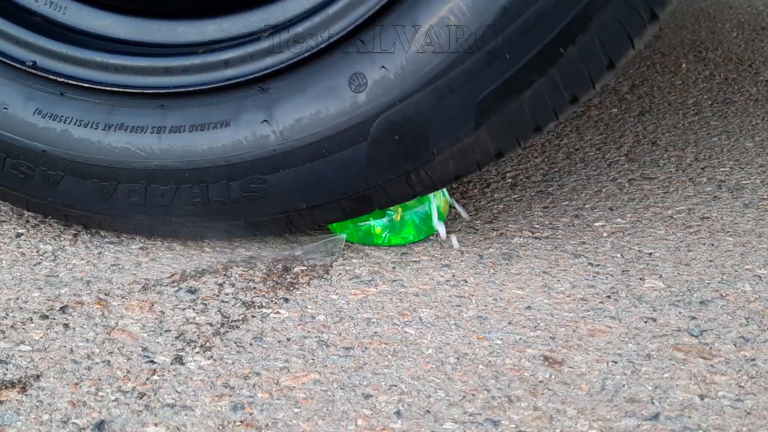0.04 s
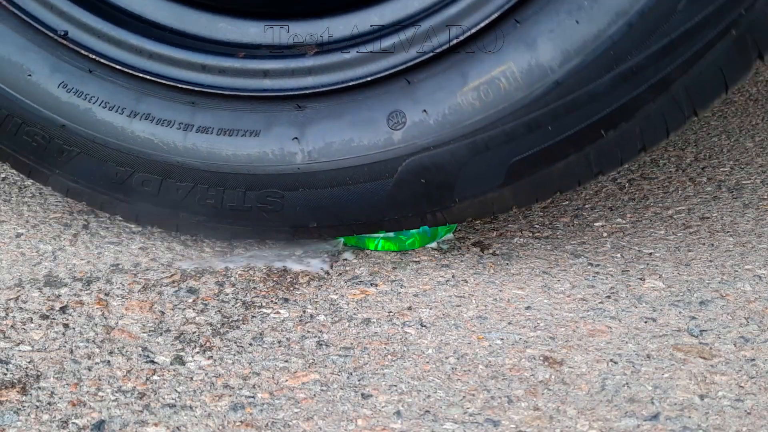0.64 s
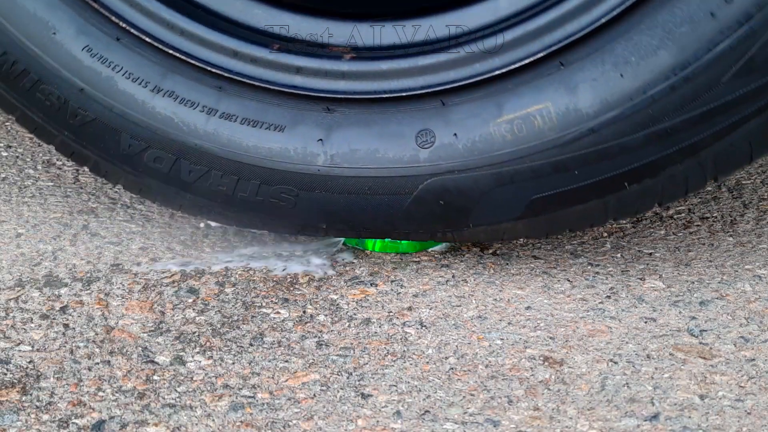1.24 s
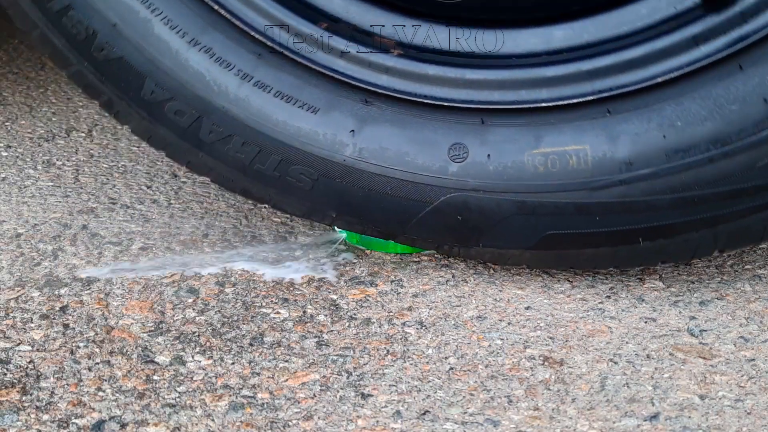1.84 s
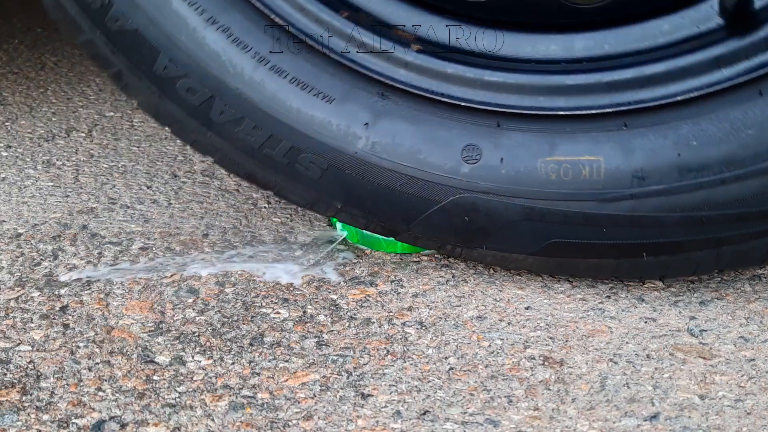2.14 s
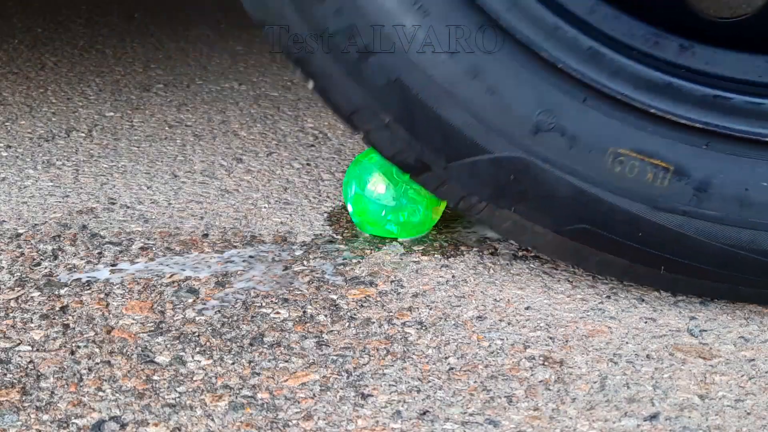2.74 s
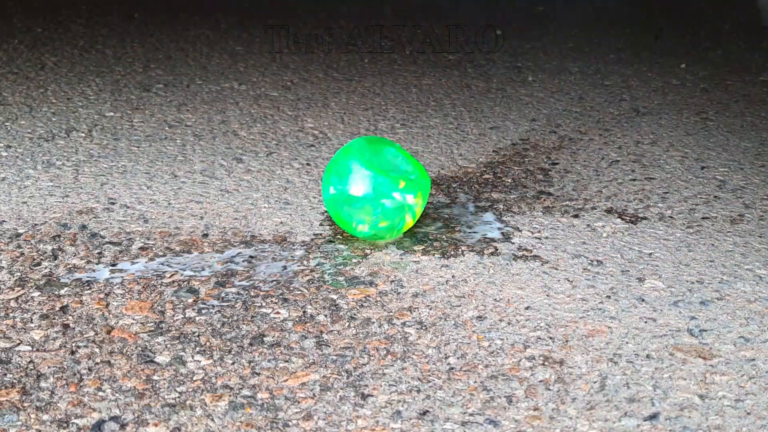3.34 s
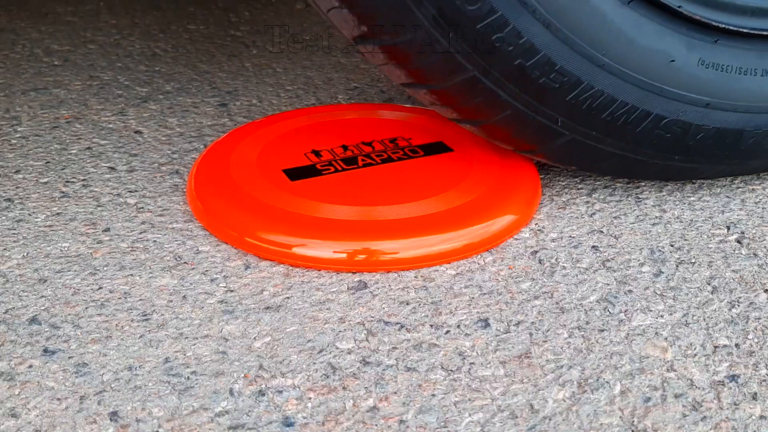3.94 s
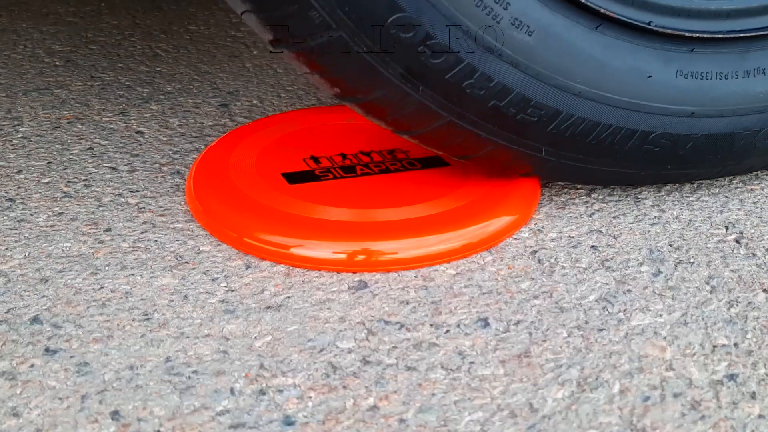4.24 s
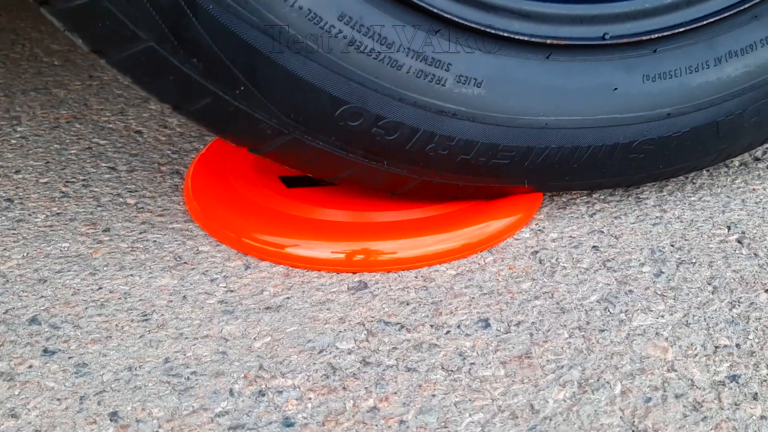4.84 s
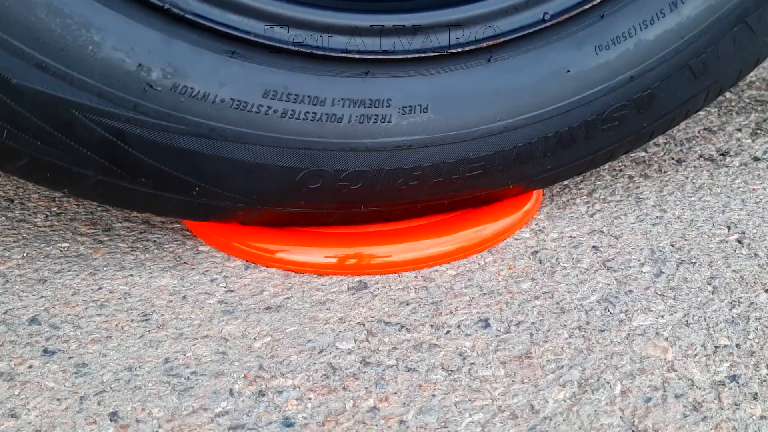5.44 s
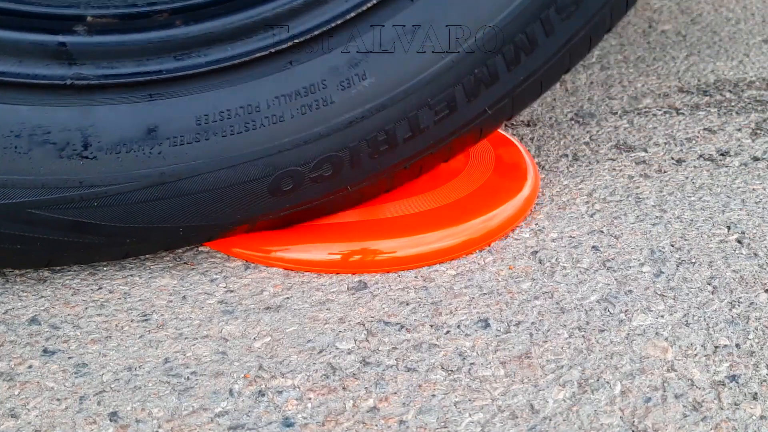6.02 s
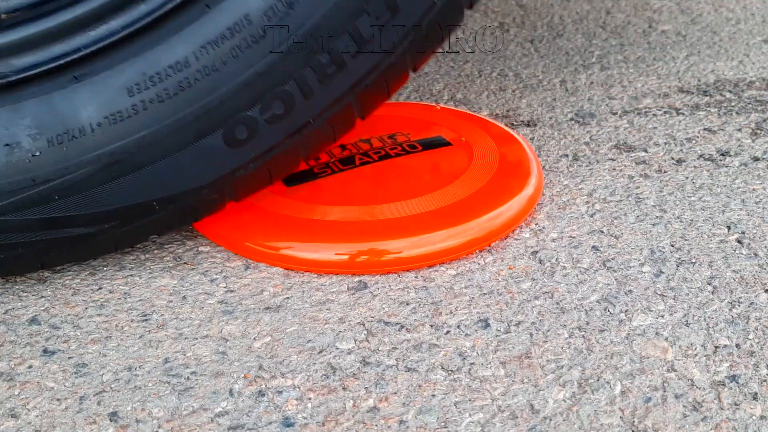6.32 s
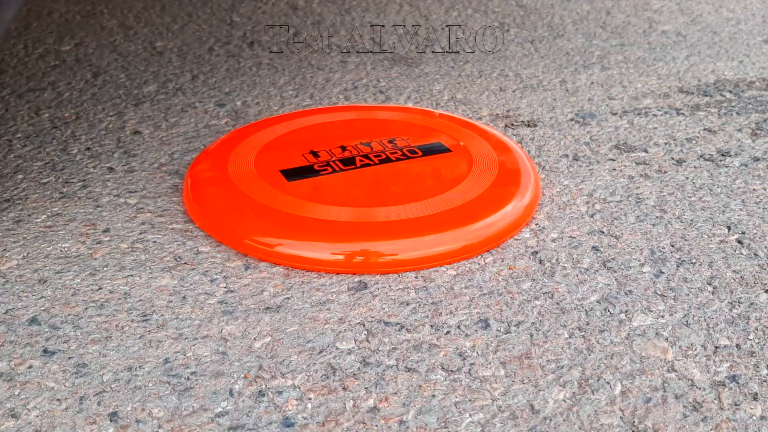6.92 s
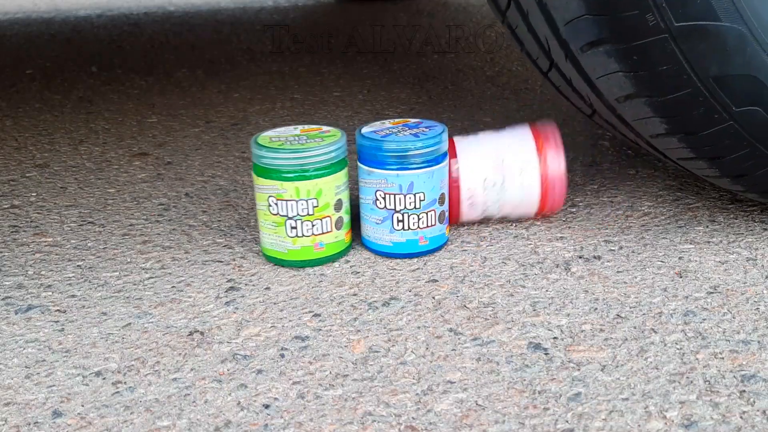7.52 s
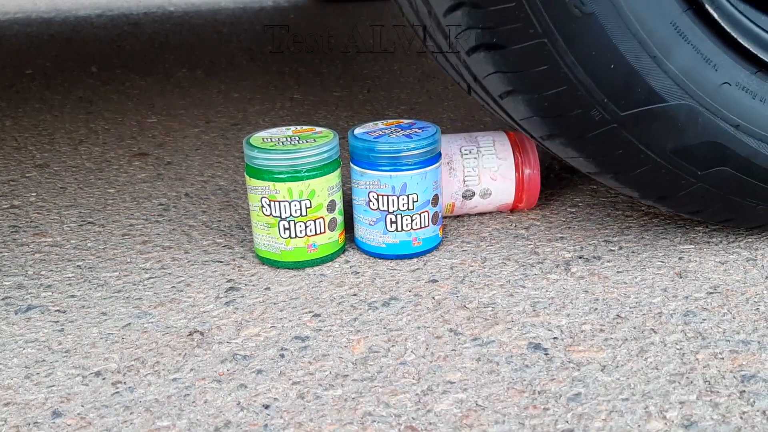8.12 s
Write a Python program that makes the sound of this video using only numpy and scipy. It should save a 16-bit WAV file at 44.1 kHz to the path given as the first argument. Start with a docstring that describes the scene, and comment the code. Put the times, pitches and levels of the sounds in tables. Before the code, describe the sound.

A car creeps over concrete outdoors, its engine whirring thinly. A liquid-filled ball under the tyre gives a brief high whistle, sprays with a spattering hiss, gurgles and pops back into shape. Next a plastic disc clicks, cracks sharply and creaks under the tread. Finally a jar tips against two others with a few quick knocks. The microphone is low and close beside the tyre, with little bass.

```python
"""Car crushing a ball, a disc and jars

A car creeps over concrete, heard from a phone low beside the front tyre. A liquid-filled ball
splits, whistles, sprays and pops back into shape; a plastic disc buckles, creaks and cracks; a jar
is tipped against two others. The engine whirrs through the gap under the car, the tread hums on wet
grit and the blows echo off the floor pan. The phone cuts the bass and clips at full scale."""
import sys
import numpy as np
from scipy import signal
from scipy.fft import rfft, irfft
from scipy.io import wavfile
from scipy.ndimage import uniform_filter1d, map_coordinates

SR = 44100
rng = np.random.default_rng(int(sys.argv[2]) if len(sys.argv) > 2 else 0)


def bounce(signal):
    """Save signal as a 16-bit WAV file at the path given by the first command-line argument."""
    frames = np.transpose(np.atleast_2d(signal))
    limited = np.clip(frames, -1, 1)
    pcm = np.round(limited * 32767).astype(np.int16)
    wavfile.write(sys.argv[1], SR, pcm)


N = 360297
TIME_S = np.arange(N) / SR
SHORT_SAMPLES = 8192
DISC_START_S, JARS_START_S, END_S = 3.45, 7.028, N / SR

# liquid flow from the ball (time [s], level [dB])
FLOW = [(0.15, -32.5), (0.38, -31.5), (0.61, -28), (0.85, -26), (1.36, -31.5), (1.61, -29.5), (2.33, -41),
        (2.56, -45.5)]
# spectra of jet, droplets and gurgle (frequency [Hz], level [dB])
JET_SPECTRUM = [(4000, -12), (6500, -16), (8500, -4), (10000, 2), (11700, 5.5), (12800, 0), (14500, 4),
                (16000, 0.5)]
SPLASH_SPECTRUM = [(600, -71), (1100, -17), (2000, -5.5), (2700, -6), (3400, -0.5), (4700, 3), (6000, 0),
                   (7500, -1.5), (10000, -10.5)]
GURGLE_SPECTRUM = [(350, -68), (800, -13.5), (1300, 9.5), (2000, 10), (2700, 6), (4000, -14.5)]
# droplet flurries (time [s], level [dB], rise [s], fall [s], lower ring [Hz], upper ring [Hz])
SURGES = [(0.5, -31.5, 0.191, 0.19, 4510, 6730), (1.06, -24.5, 0.18, 0.16, 3765, 5490),
          (1.25, -28.5, 0.19, 0.28, 4620, 5300), (1.79, -25.5, 0.35, 0.22, 3376, 7500)]
# sputtering at the split (time [s], level [dB], rise [s], fall [s])
GURGLES = [(1.06, -35, 0.08, 0.15), (2.35, -35.5, 0.12, 0.32)]
# puffs of distortion at the whistle's peaks (time [s], level [dB])
OVERLOAD_PUFFS = [(0.04, -41.5), (0.086, -45)]
# air re-entering the ball (time [s], hollow tone [dB], hiss [dB], rise [s], fall [s])
GULPS = [(2.34, -32, -59, 0.11, 0.38), (2.72, -27, -23.5, 0.125, 0.028), (2.768, -27, -33, 0.036, 0.049)]
# ball skin unfolding (time [s], level [dB], pitch [Hz], relative crinkle [dB], t60 [s])
BALL_POPS = [(2.705, -14, 3100, -1, 0.0094), (2.712, -10, 3330, 5, 0.0093), (2.717, -18, 3500, -19, 0.011),
             (2.724, -16.5, 1710, 7, 0.019), (2.727, -13.5, 6470, 10, 0.018), (2.7478, 2, 3680, -14, 0.015),
             (2.771, -30, 3020, 2, 0.012), (2.870, -33, 2110, -2, 0.029), (2.96, -16.5, 4000, -11, 0.0052)]

# disc cracks and knocks, including quick slap echoes of the crack just before (time [s], level [dB],
# top mode [dB], thud [dB], rim [dB], snap [dB], dish pitch [Hz], rim pitch [Hz]);
# top mode to snap are relative gains
DISC_KNOCKS = [(3.992, -23.5, -10, -20, -11, -35, 1610, 4570), (4.027, -15.5, 3, -17, -13, -34, 1577, 4000),
               (4.04, -28, 1, -8.5, -4, -19, 1520, 3660), (4.9634, -10, -1, -11, -5.5, -4, 1614, 4750),
               (4.992, -7, -6.5, -8, -12.5, -11, 1445, 3270), (6.05, -26.5, 0, -7, 6, 3.5, 1490, 4090),
               (6.104, -8.5, -1, -22, -4.5, -17.5, 1572, 3750),
               (6.162, -20, -11, -28, -15, -22, 1505, 3250),
               (6.228, -10.5, -11, -29, -0.5, -18.5, 1642, 3350), (6.333, -41, -8, -2, 2, -15, 1630, 3650),
               (6.366, -17.5, -5, -15.5, -11, -15.5, 1580, 3700),
               (6.383, -27.5, -9, -14, -2, -22, 1560, 3460), (6.41, -11, 2, -9.5, -2.5, -23.5, 1570, 3360),
               (6.425, -18, -4, -14, -14, -20, 1600, 3530), (6.44, -26, -6, -10, -9, -25, 1570, 4370)]
# short disc ticks, including quick slap echoes (time [s], level [dB], relative rim level [dB])
DISC_TICKS = [(4.096, -31.5, -8), (4.42, -26, -18), (4.702, -25, -10.5), (4.7748, -31.5, -2.5),
              (4.858, -23.5, 0.5), (4.907, -25, -9), (4.92, -27, -9), (4.974, -22, -5), (4.981, -26, -1),
              (5.039, -39, 2), (5.635, -20, -10.5), (5.682, -24.5, -10), (5.761, -25.5, 4),
              (5.875, -41, -10)]
# whole-disc modes (frequency [Hz], level [dB], t60 [s])
THUD_MODES = [(756, -15, 0.018), (879, 3, 0.021), (1140, -2, 0.044)]
# dish and rim modes (pitch ratio, level [dB], t60 [s])
DISH_MODES = [(0.88, -9.5, 0.013), (1, -0.5, 0.015), (1.1, -8.5, 0.011), (1.39, 6, 0.0067)]
RIM_MODES = [(0.85, 0.5, 0.0094), (1, 6, 0.013), (1.13, -1, 0.011), (1.38, -14, 0.013)]
# disc snap and ball crinkle (frequency [Hz], level [dB])
SNAP_SPECTRUM = [(2500, -20), (5000, -11.5), (7500, -1.5), (10500, -2.5), (13000, -5), (16000, -1)]

# jars struck and scraped (time [s], level [dB], rise [s], t60 [s], relative grit [dB])
JAR_KNOCKS = [(7.274, -38.5, 0.0013, 0.043, 1.5), (7.441, -18, 0.004, 0.033, -5),
              (7.448, -13, 0.00055, 0.053, -4.5), (7.462, -19, 0.0016, 0.036, -23),
              (7.527, -34, 0.002, 0.067, -3), (7.5438, -29.5, 0.0003, 0.05, -1),
              (7.5918, -18, 0.00015, 0.016, -8), (7.622, -28, 0.004, 0.041, -12),
              (7.633, -30, 0.0017, 0.12, -2.5)]
# modes of a full jar (frequency [Hz], width [Hz], level [dB])
JAR_MODES = [(354, 160, -15), (595, 106, -10), (920, 260, -5.5), (1210, 140, -0.5), (1484, 96, 4.5),
             (2000, 146, 2.5), (2330, 160, 1.5), (2920, 370, -1.5), (3900, 710, -9.5), (5670, 780, -10.5)]
# grit on concrete (frequency [Hz], level [dB])
GRIT_SPECTRUM = [(2000, -25), (4500, -4), (8000, 1), (12000, 0), (16000, -1)]
# wet grit under the tread (time [s], level [dB], rise [s], fall [s])
GRIT_PATCHES = [(2.95, -46, 0.18, 0.32), (3.31, -43, 0.088, 0.15), (4.11, -43.5, 0.042, 0.09),
                (4.85, -50.5, 0.57, 0.15), (6.35, -45.5, 0.08, 0.11)]

# engine whirr beside each object, and engine hiss (frequency [Hz], level [dB])
WHIRR_AT_BALL = [(120, -85), (200, -61.5), (683, -20.5), (791, -14.5), (1230, -3.5), (1350, -7), (1530, 1),
                 (1650, -3.5), (2090, 0.5), (2420, -3), (4270, -0.5), (4860, -5.5), (7140, -15),
                 (11700, -11.5), (16000, -14)]
WHIRR_AT_DISC = [(120, -85), (200, -51.5), (558, -32), (847, -19.5), (1110, -16), (1170, -13.5),
                 (1340, -11.5), (1510, -9.5), (1680, -8), (2010, -6.5), (3330, -12.5), (4480, -10),
                 (5050, -12.5), (7000, -23.5), (9100, -62), (15400, -120)]
WHIRR_AT_JARS = [(120, -89), (200, -32), (440, -29.5), (511, -31), (698, -27), (752, -13), (859, -11.5),
                 (1120, -5.5), (1510, -4), (2070, -0.5), (3180, -7), (4100, -4), (7000, -15), (9100, -45),
                 (15400, -120)]
ENGINE_HISS = [(4500, -31), (6300, -6.5), (8000, -6.5), (10000, -11), (12000, -5), (15500, -13)]
# engine beside the disc: fades, ducks after the loud crack, partly recovers (time [s], level [dB])
ENGINE_LEVEL_AT_DISC = [(3.6, -36), (4.35, -44), (4.9, -44), (5.13, -51.5), (5.6, -48), (6.1, -47.5),
                        (7.0, -45.5)]
# resonances between car and ground (frequency [Hz], width [Hz], boost [dB])
GAP_RESONANCES = [(1543, 117, 8.5), (2030, 290, 4), (2960, 570, 1.5), (4350, 600, 1)]
# hollow between wheel and ground (time [s], frequency [Hz], level [dB])
WHEEL_NOTE = [(0, 1120, -57), (0.8, 1080, -55), (2.3, 1200, -54.5), (3.0, 1400, -51.5), (3.4, 1350, -52),
              (3.8, 1550, -45.5), (4.3, 1230, -59), (4.9, 1130, -64)]
# tread groove resonances (frequency [Hz], width [Hz], level [dB])
GROOVE_MODES = [(2107, 390, -0.3), (4255, 950, -1)]
# tread meeting the disc, then bearing down (time [s], level [dB], rise [s], fall [s])
TREAD_SWELLS = [(3.55, -39, 0.2, 1.27), (4.92, -47, 0.42, 0.1)]


def spray(jet_db=4, fresh_lift_db=8, jet_end_s=2.66, splash_end_s=2.18, wedge_hz=4650):
    """A thin jet hisses from the split; droplets hit the concrete and ring the wedge under the tread."""
    flow = undb(curve(FLOW))
    nozzle = noise_band(11600 + 150 * walk(4), 900, likeness=0)
    jet = reflections(unit(colour(noise(), JET_SPECTRUM)) + undb(-9.5) * nozzle, 0.23)
    jet *= flow * undb(jet_db + fresh_lift_db * freshness() + 0.23 * walk(40)) * pan(1)
    patter = droplets(spread_db=1)
    wedge = noise_band(wedge_hz * (1 + 0.03 * walk(12)), 960, likeness=0) * undb(-9.5 + 2 * walk(25))
    splash = reflections(patter + wedge, 0.61) * flow
    return jet * gate(0, jet_end_s) + splash * gate(0, splash_end_s, fade_s=0.21)


def droplets(spread_db):
    """Fine drops of uneven size patter on concrete; rms 1."""
    return unit(colour(noise() * undb(spread_db * rng.exponential(size=(2, N))), SPLASH_SPECTRUM))


def surges():
    """Heavier flurries of droplets, each ringing two resonances of the wedge."""
    patter = droplets(spread_db=1.8)
    waver = 1 + 0.025 * walk(12)
    out = 0
    for s, db, rise_s, fall_s, lower_hz, upper_hz in SURGES:
        lower = undb(-2.5) * noise_band(lower_hz * waver, 500, likeness=0)
        upper = undb(-3) * noise_band(upper_hz * waver, 930, likeness=0)
        out += undb(db) * swell(s, rise_s, fall_s) * unit(patter + lower + upper)
    rms = np.sqrt(np.mean(out ** 2))
    return rms * reflections(out, 0.58, count=4)


def gurgle():
    """Air and liquid sputter through the split together, lower than the jet."""
    return unit(colour(noise(0.12), GURGLE_SPECTRUM)) * swells(GURGLES) * undb(2 * walk(130))


def whistle(level_db=-21.5, peak_lift_db=4.5):
    """Edge tone at the lips of the fresh split: fluttering, with two brief peaks, aimed right."""
    tone = noise_band(9470 + 30 * walk(58), 250)
    overblown = noise_band(10600, 790) + 0.94 * noise_band(13600, 500)
    peaks = sum(swell(s, 0.0066, 0.0166) for s, _ in OVERLOAD_PUFFS)
    envelope = freshness() * undb(level_db + peak_lift_db * peaks + 1.5 * walk(250))
    return (tone + undb(-11) * overblown) * envelope * pan(-12)


def freshness(hold_s=0.066, release_s=0.089):
    """1 while the split is fresh and narrow, then falling away."""
    return np.maximum(gate(0, hold_s), swell(hold_s, release_s, release_s))


def overload_puffs():
    """Soft, dull puffs of distortion as the whistle's peaks overload the phone."""
    out = np.zeros((2, N))
    for s, db in OVERLOAD_PUFFS:
        puff = colour(noise(0.93, SHORT_SAMPLES), [(200, -1), (700, -9.5), (1200, -7.5), (2000, -5.5)])
        add(out, s - 0.003, undb(db) * burst(puff * strike(0.0047, 0.016)) * pan(-35.5))
    return out


def ball_rebound():
    """Freed from the tyre, the ball gulps air, crinkles and pops round again."""
    draught = unit(resonate(resonate(noise(0.068), 3700, 2150), 3400, 2500))
    hollow = unit(draught + 0.78 * noise_band(3300 + 50 * walk(11), 420)) * undb(0.64 * walk(150))
    hiss = unit(colour(noise(), [(4000, -20), (7000, -6.5), (10000, -3), (13000, 6), (16000, -3.5)]))
    hiss *= undb(2.95 * walk(240))
    out = np.zeros((2, N))
    for s, hollow_db, hiss_db, rise_s, fall_s in GULPS:
        out += swell(s, rise_s, fall_s) * (undb(hollow_db) * hollow + undb(hiss_db) * hiss)
    for s, db, hz, crinkle_db, t60_s in BALL_POPS:
        modes = [(0.9, -5.5, t60_s), (1, -1.5, t60_s), (1.13, -5.5, t60_s), (1.3, -11, t60_s)]
        tone = ring(modes, rise_s=0.00041, detune=0.0062, spread_rad=0.22, pitch=hz)
        crinkle = colour(noise(size=SHORT_SAMPLES), SNAP_SPECTRUM) * strike(0.0002, 0.017)
        add(out, s, undb(db) * (tone + undb(crinkle_db) * crinkle))
    return out


def disc(knock_push_s=0.00046, tick_push_s=0.00049, delay_s=0.0004):
    """Cracking plastic and its slap echoes: knocks mix thud, dish, rim and snap; ticks mostly snap."""
    out = np.zeros((2, N))
    for s, db, top_db, thud_db, rim_db, snap_db, dish_hz, rim_hz in DISC_KNOCKS:
        # muffled by the tyre: longer push, weaker and duller snap
        push_s = knock_push_s * 2 ** (-snap_db / 16)
        tilt_db_per_octave = 0.46 * min(snap_db, 0) - 5
        thud = undb(thud_db - 5.5) * burst(ring(THUD_MODES, push_s, detune=0.04, spread_rad=0.65))
        body = thud + dish(dish_hz, push_s, top_db) + undb(rim_db) * rim(rim_hz, push_s)
        crack = undb(snap_db) * snap(push_s, tilt_db_per_octave)
        add(out, s + delay_s, undb(db) * (body + crack))
    for s, db, rim_db in DISC_TICKS:
        body = rim(4286, tick_push_s) + undb(-13) * dish(1555, tick_push_s)
        add(out, s + delay_s, undb(db) * (snap(tick_push_s) + undb(rim_db) * body))
    # little radiation below the lowest mode
    return colour(out, [(450, -22), (720, 0.5), (16000, -0.5)]) * pan(1)


def dish(hz, push_s, top_db=0):
    """Flexing modes of the dish; top_db sets the share of the highest."""
    *lower, (ratio, db, t60_s) = DISH_MODES
    modes = lower + [(ratio, db + top_db, t60_s)]
    return undb(-3.5) * burst(ring(modes, push_s, detune=0.0078, spread_rad=0.38, pitch=hz))


def rim(hz, push_s):
    """The rim rings while its edge crunches on the concrete."""
    spectrum = [(2000, -8), (3000, 8.5), (5500, -0.5), (8000, -16.5), (12000, -44)]
    crunch = burst(colour(noise(0.33, SHORT_SAMPLES), spectrum) * strike(push_s, 0.014))
    tone = burst(ring(RIM_MODES, push_s, detune=0.0098, spread_rad=0.84, pitch=hz))
    return undb(-7) * (tone + undb(-8) * crunch)


def snap(push_s, tilt_db_per_octave=0):
    """Bright crack of plastic, tilted above 7 kHz."""
    spectrum = [(hz, db + tilt_db_per_octave * max(np.log2(hz / 7000), 0)) for hz, db in SNAP_SPECTRUM]
    return undb(-3.5) * burst(colour(noise(0.13, SHORT_SAMPLES), spectrum) * strike(push_s, 0.0057))


def creak(start_s=5.4555, end_s=5.568, first_gap_s=0.017, shortest_gap_s=0.0038):
    """The tread sticks and slips ever faster on the dish; one dry tick per slip."""
    modes = [(1350, -4, 0.011), (1650, 0, 0.011), (2100, -3, 0.009),
             (4000, -18, 0.004), (7500, -26, 0.003)]
    out = np.zeros((2, N))
    s, gap_s = start_s, first_gap_s
    while s < end_s:
        add(out, s, ring(modes, rise_s=0.0002, detune=0.03, spread_rad=0.3))
        s += gap_s * np.exp(0.03 * rng.standard_normal())
        gap_s = shortest_gap_s + 0.77 * (gap_s - shortest_gap_s)
    out *= undb(-24.5) * swell(5.505, 0.085, 0.085) * pan(3)
    # a small patch of dish radiates little bass
    return colour(out, [(600, -26), (1100, -0.5), (16000, 9)])


def jars():
    """Jars skid on grit and knock together: a rush of tiny contacts excites their damped walls."""
    out = np.zeros((2, N))
    for s, db, rise_s, t60_s, grit_db in JAR_KNOCKS:
        envelope = strike(rise_s, t60_s)
        contacts = noise(0.56, SHORT_SAMPLES) * envelope
        walls = burst(sum((-1) ** k * undb(mode_db) * resonate(contacts, hz, width_hz)
                          for k, (hz, width_hz, mode_db) in enumerate(JAR_MODES)))
        grains = noise(size=SHORT_SAMPLES)
        grains *= np.repeat(undb(1.7 * rng.exponential(size=SHORT_SAMPLES // 32)), 32)
        grit = burst(colour(grains, GRIT_SPECTRUM) * envelope)
        add(out, s, undb(db) * (walls + undb(grit_db) * grit))
    return out


def wet_grit(grains_per_s=750, spread_db=3):
    """Patches of tiny, uneven grains tick under the tread."""
    hits = rng.random((2, N)) < grains_per_s / SR
    sizes = undb(spread_db * np.minimum(rng.exponential(size=(2, N)), 4))
    return unit(colour(hits * sizes * noise(), GRIT_SPECTRUM)) * swells(GRIT_PATCHES)


def engine(at_ball_db=-41, at_jars_db=-35, tyre_clear_s=2.82, clear_lift_db=4):
    """Belts, fan and valves whirr through the gap under the car, differently beside each object."""
    flutter = undb(0.8 * walk(60) + 0.6 * walk(9))
    lift_db = clear_lift_db * gate(tyre_clear_s, END_S, fade_s=0.34)
    whirr = unit(colour(noise(0.075), WHIRR_AT_BALL, GAP_RESONANCES))
    out = gate(0, DISC_START_S) * undb(at_ball_db + lift_db) * whirr * pan(0.87)
    places = [(DISC_START_S, JARS_START_S, curve(ENGINE_LEVEL_AT_DISC), WHIRR_AT_DISC, 2),
              (JARS_START_S, END_S, at_jars_db, WHIRR_AT_JARS, 0.3)]
    for start_s, end_s, db, spectrum, pan_db in places:
        whirr = unit(colour(noise(0.057), spectrum, GAP_RESONANCES))
        hiss = undb(-9.5) * unit(colour(noise(0.071), ENGINE_HISS))
        out += gate(start_s, end_s) * undb(db) * (whirr + hiss) * pan(pan_db)
    return out * flutter


def wheel_hollow():
    """Engine noise rings in the hollow by the wheel; the note glides as the car rolls."""
    note = noise_band(curve(WHEEL_NOTE), 73, likeness=0.11)
    return note * undb(curve(WHEEL_NOTE, column=2)) * gate(0, WHEEL_NOTE[-1][0])


def tread_hum():
    """The tread grooves resonate as they roll onto the disc."""
    grooves = sum(undb(db) * noise_band(hz, width_hz, likeness=0.43) for hz, width_hz, db in GROOVE_MODES)
    return grooves * swells(TREAD_SWELLS) * pan(4.6)


def engine_whine(start_hz=13570, climb_hz_per_s2=400, start_db=-54, fade_db_per_s=8):
    """Thin engine whine beside the jars, climbing and fading."""
    elapsed_s = np.maximum(TIME_S - JARS_START_S, 0)
    whine = noise_band(start_hz + climb_hz_per_s2 * elapsed_s ** 2, 25)
    return whine * undb(start_db - fade_db_per_s * elapsed_s) * gate(JARS_START_S, END_S)


def underbody(x, t60_s, tail_db=-8, slap_s=0.022, slap_db=-25):
    """Echo between ground and floor pan: one early slap, a short diffuse tail."""
    tail = colour(noise(0.11, SHORT_SAMPLES), [(500, 1.5), (1500, -1.5), (5000, 1.5), (15000, -1.5)])
    tail *= strike(0.0026, t60_s)
    tail *= undb(tail_db) / np.sqrt(np.sum(tail ** 2) / 2)
    tail[:, int(slap_s * SR)] += undb(slap_db)
    return x + signal.fftconvolve(x, tail, axes=1)[:, :N]


def reflections(x, gain, count=6, drift=0.05):
    """Tyre, rim and ground reflections comb the sound, drifting as the wheel turns; rms 1."""
    out = x.copy()
    for lag_s in rng.uniform(0.001, 0.009, count):
        position = np.arange(N) - lag_s * SR * (1 + drift * walk(1.94))
        delayed = np.array([map_coordinates(channel, [position], order=2) for channel in x])
        out += gain * rng.choice([-1, 1]) * delayed
    return unit(out)


def ring(modes, rise_s, detune, spread_rad, pitch=1):
    """Decaying modes (frequency / pitch, level [dB], t60 [s]); phase differs left and right."""
    t = TIME_S[:SHORT_SAMPLES]
    out = 0
    for frequency, db, t60_s in modes:
        shift, gain, lag = rng.standard_normal(3)
        phase = 2 * np.pi * (pitch * frequency * (1 + detune * shift) * t + rng.random())
        offset_rad = spread_rad * lag * np.array([[1], [-1]])
        out += undb(db + 2 * gain) * strike(rise_s, t60_s) * np.sin(phase + offset_rad)
    return out


def noise(likeness=0, size=N):
    """Stereo white noise; likeness is the left-right correlation."""
    both, left, right = rng.standard_normal((3, size))
    return np.sqrt(likeness) * both + np.sqrt(1 - likeness) * np.array([left, right])


def noise_band(hz, width_hz, likeness=0.08):
    """Narrow noise about a steady or moving centre; rms 1."""
    lowpass = signal.butter(2, width_hz / 2, fs=SR, output="sos")
    baseband = signal.sosfilt(lowpass, noise(likeness) + 1j * noise(likeness))
    phase = 2 * np.pi * np.cumsum(np.broadcast_to(hz, N)) / SR
    return unit(np.real(baseband * np.exp(1j * phase)))


def walk(rate_hz):
    """Smooth random drift, spread near 1."""
    hold = int(SR / rate_hz)
    steps = np.repeat(rng.standard_normal(N // hold + 1), hold)
    return 1.3 * uniform_filter1d(uniform_filter1d(steps, hold), hold)[:N]


def colour(x, spectrum, resonances=()):
    """Filter by (frequency [Hz], level [dB]) points, 24 dB/octave below the first, plus resonances."""
    hz = np.fft.rfftfreq(x.shape[-1], 1 / SR) + 1
    point_hz, point_db = np.transpose(spectrum)
    db = np.interp(np.log(hz), np.log(point_hz), point_db)
    db -= 24 * np.maximum(np.log2(point_hz[0] / hz), 0)
    for centre_hz, width_hz, boost_db in resonances:
        db += boost_db / (1 + (2 * (hz - centre_hz) / width_hz) ** 2)
    return irfft(rfft(x) * undb(db), x.shape[-1])


def resonate(x, hz, width_hz):
    """Two-pole resonance, gain 1 at the centre."""
    return signal.lfilter(*signal.iirpeak(hz, hz / width_hz, fs=SR), x)


def strike(rise_s, t60_s):
    """Impact envelope: quick rise, exponential fall."""
    t = TIME_S[:SHORT_SAMPLES]
    return (1 - np.exp(-t / rise_s)) * np.exp(-np.log(1000) * t / t60_s)


def swell(peak_s, rise_s, fall_s):
    """Bell envelope, 20 dB down at rise_s before and fall_s after the peak."""
    t = TIME_S - peak_s
    return undb(-20 * np.minimum(np.where(t < 0, t / rise_s, t / fall_s) ** 2, 10))


def swells(table):
    """Sum of bell envelopes, one per row."""
    return sum(undb(db) * swell(s, rise_s, fall_s) for s, db, rise_s, fall_s in table)


def gate(start_s, end_s, fade_s=0.0027):
    """1 from start to end, linear fades outside."""
    return np.clip((TIME_S - start_s) / fade_s + 1, 0, 1) * np.clip((end_s - TIME_S) / fade_s + 1, 0, 1)


def curve(table, column=1):
    """Table column interpolated at every sample."""
    rows = np.array(table, float)
    return np.interp(TIME_S, rows[:, 0], rows[:, column])


def burst(x):
    """Scale to the energy of 15 ms at rms 1."""
    return x / np.sqrt(np.mean(np.sum(x ** 2, axis=-1)) / 660 + 1e-20)


def unit(x):
    """Scale to rms 1."""
    return x / np.sqrt(np.mean(x ** 2) + 1e-20)


def undb(db):
    """Decibels to gain."""
    return 10 ** (np.asarray(db) / 20)


def pan(db):
    """Stereo gains for a left-minus-right level."""
    return undb(np.array([[db], [-db]]) / 2)


def add(out, s, x):
    """Mix x in at s seconds."""
    i = int(s * SR)
    out[:, i:i + x.shape[1]] += x[:, :N - i]


def scene():
    """Leaking ball, blows and car; rebound, creak and grit sound in the open, with a shorter echo."""
    leak = spray() + surges() + gurgle() + whistle() + overload_puffs()
    in_open = underbody(ball_rebound() + creak() + wet_grit(), t60_s=0.061)
    under_car = underbody(disc() + jars(), t60_s=0.13)
    car = engine() + wheel_hollow() + tread_hum() + engine_whine()
    return leak + in_open + under_car + car


def record(dry, low_cut_hz=480, top_hz=15850):
    """The phone cuts the bass against wind, clips at full scale and drops the top."""
    highpass = signal.butter(4, low_cut_hz, "high", fs=SR, output="sos")
    lowpass = signal.ellip(10, 0.2, 80, top_hz, fs=SR, output="sos")
    clipped = np.clip(signal.sosfilt(highpass, dry), -1, 1)
    return signal.sosfilt(lowpass, clipped)


dry = scene()
out = record(dry)
bounce(out)
```